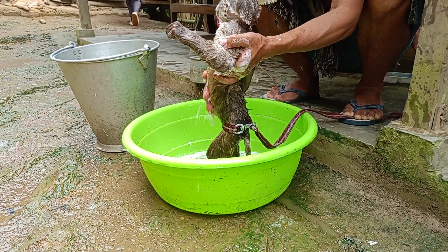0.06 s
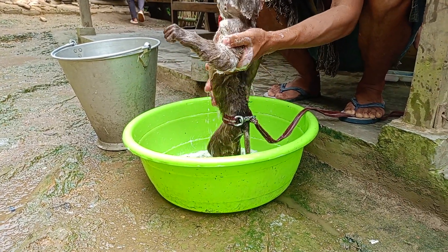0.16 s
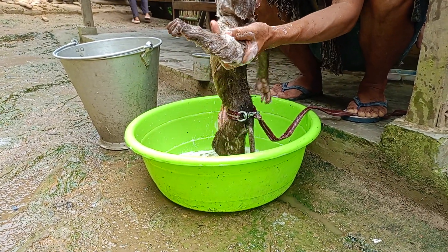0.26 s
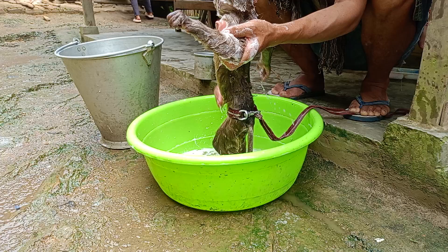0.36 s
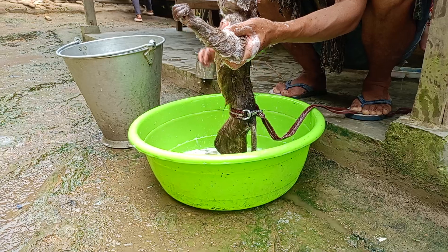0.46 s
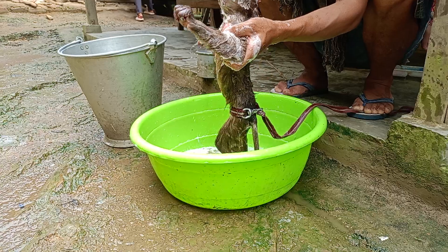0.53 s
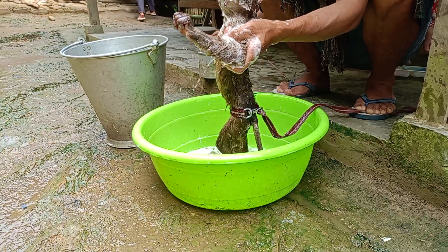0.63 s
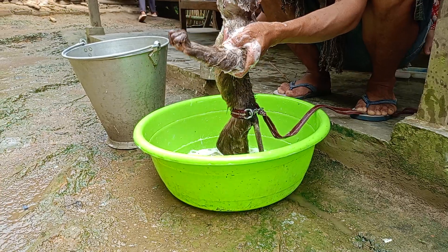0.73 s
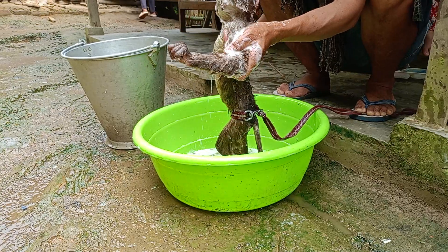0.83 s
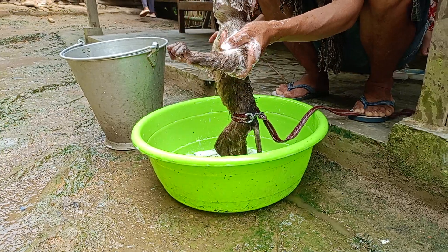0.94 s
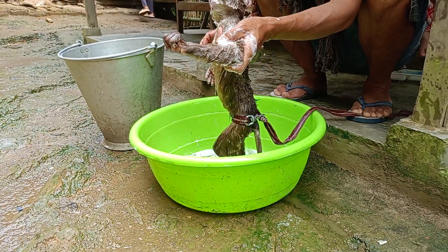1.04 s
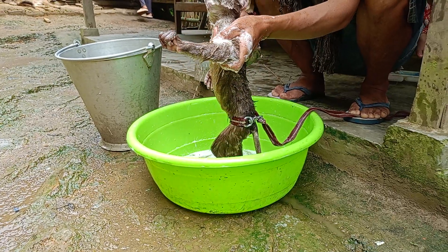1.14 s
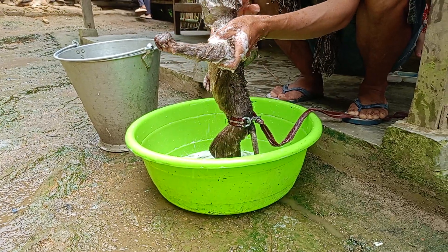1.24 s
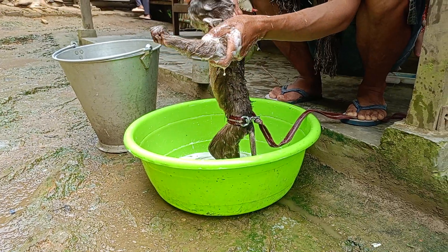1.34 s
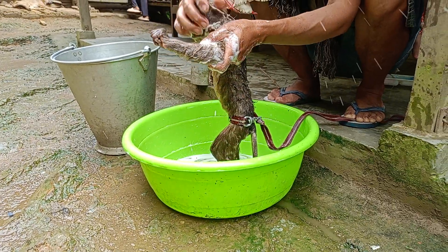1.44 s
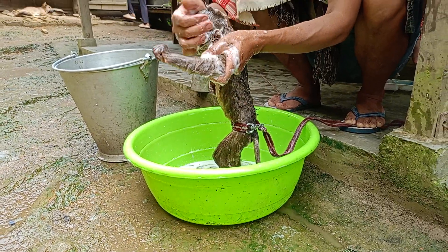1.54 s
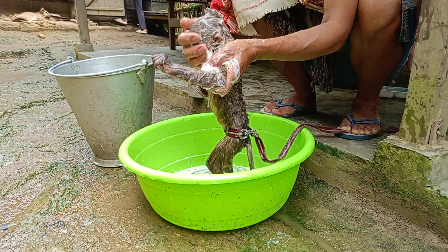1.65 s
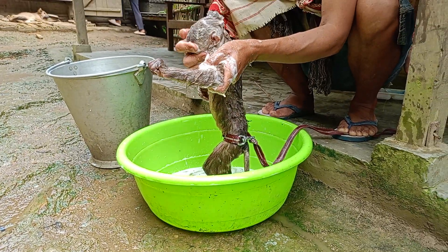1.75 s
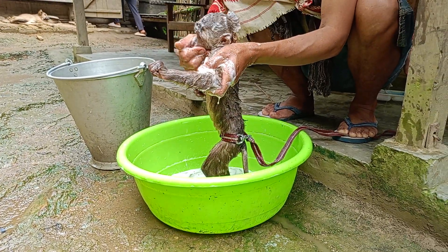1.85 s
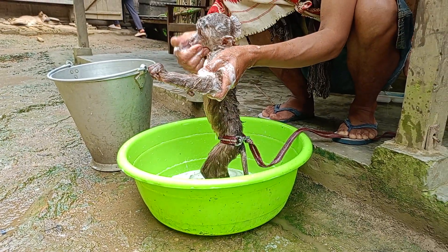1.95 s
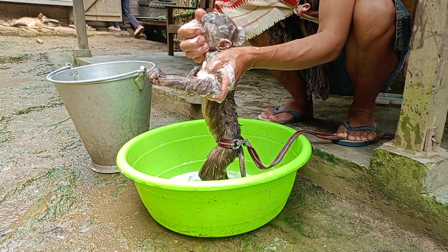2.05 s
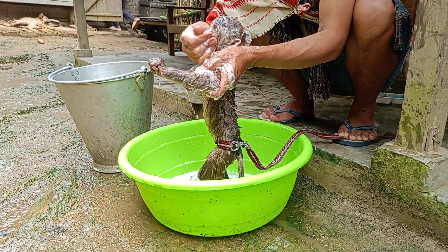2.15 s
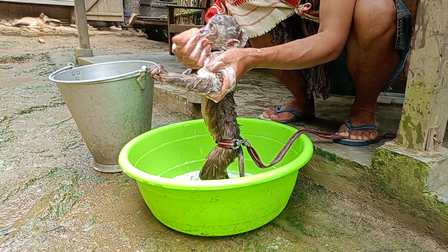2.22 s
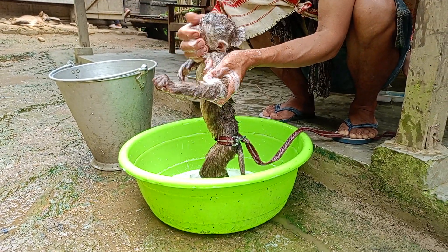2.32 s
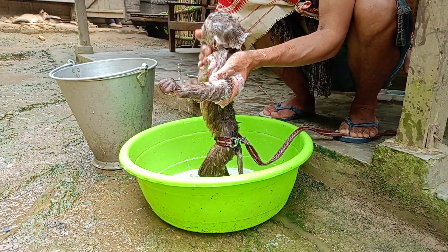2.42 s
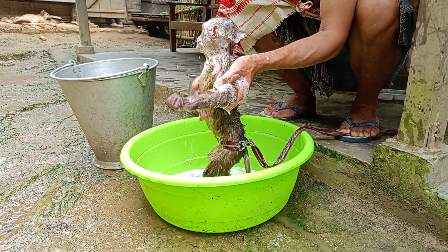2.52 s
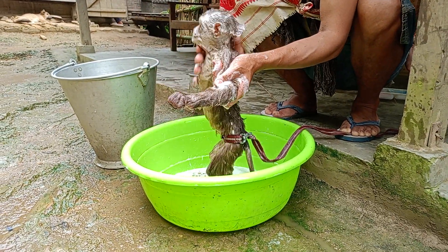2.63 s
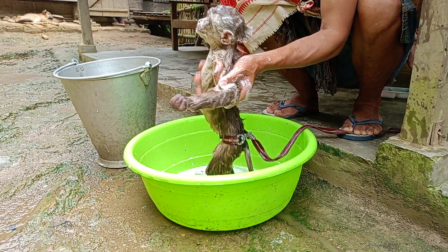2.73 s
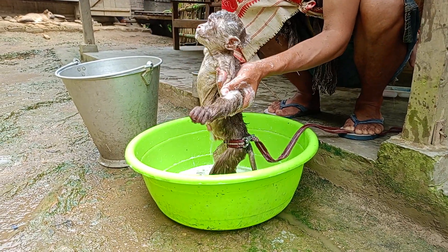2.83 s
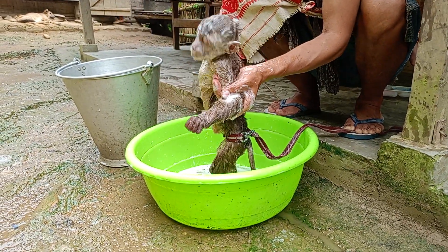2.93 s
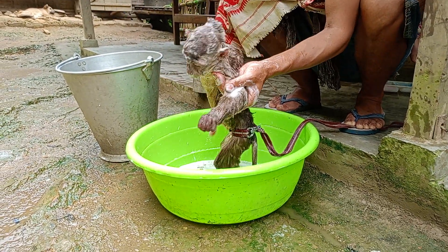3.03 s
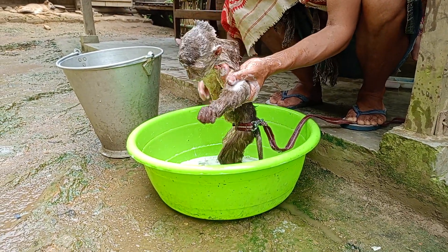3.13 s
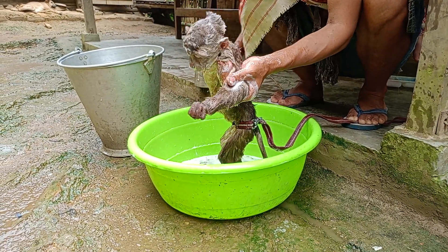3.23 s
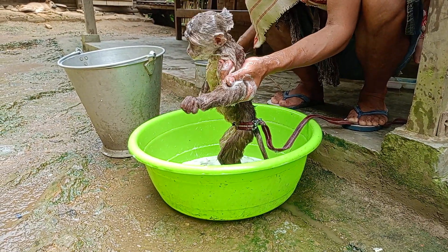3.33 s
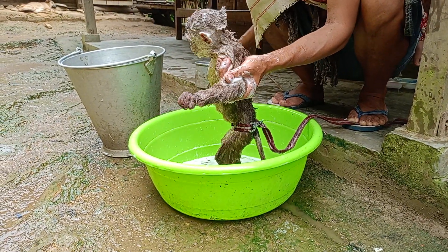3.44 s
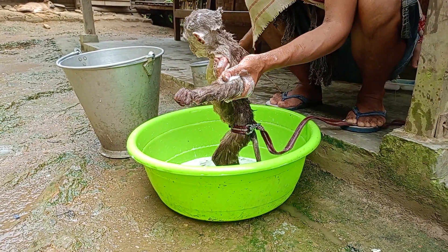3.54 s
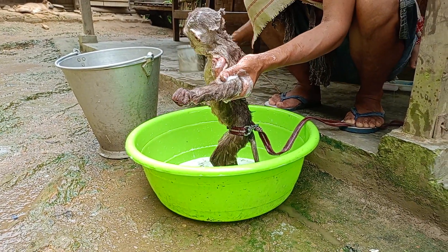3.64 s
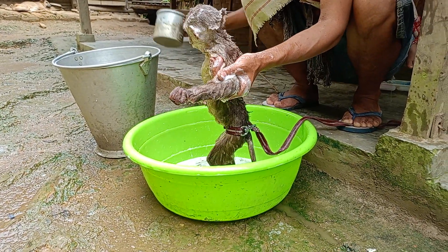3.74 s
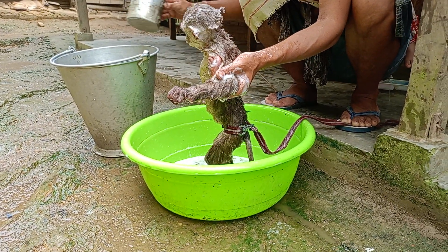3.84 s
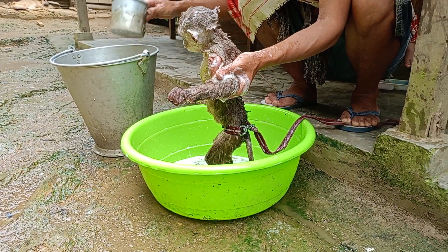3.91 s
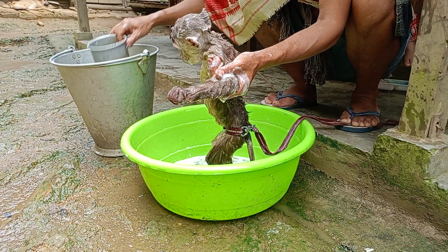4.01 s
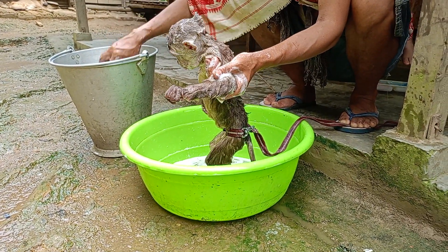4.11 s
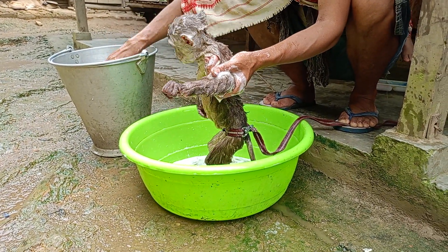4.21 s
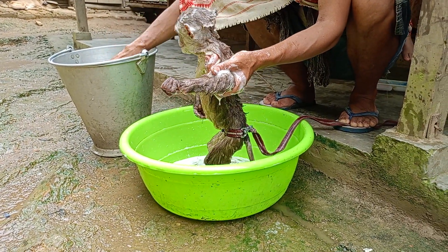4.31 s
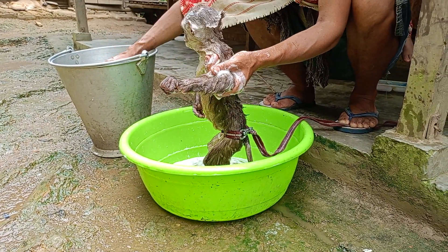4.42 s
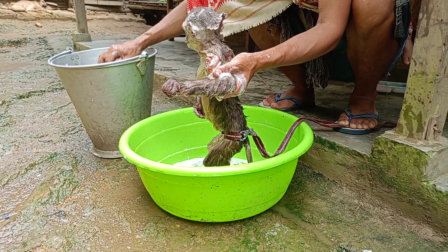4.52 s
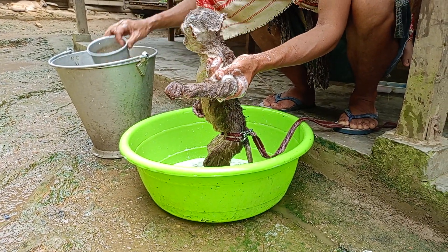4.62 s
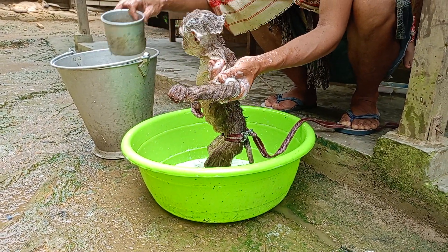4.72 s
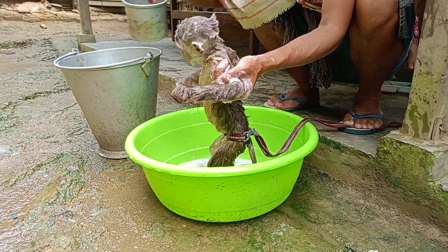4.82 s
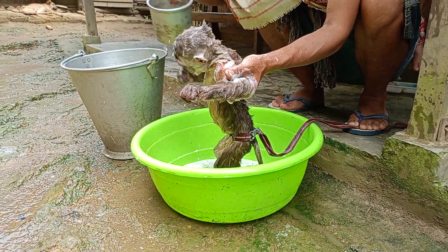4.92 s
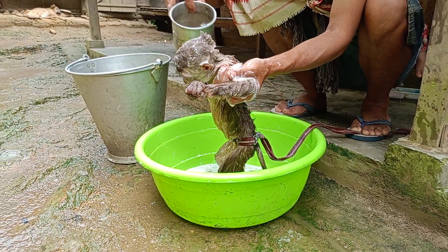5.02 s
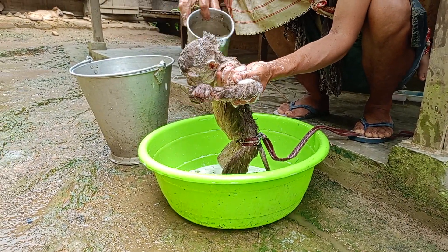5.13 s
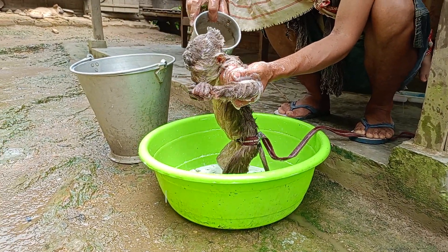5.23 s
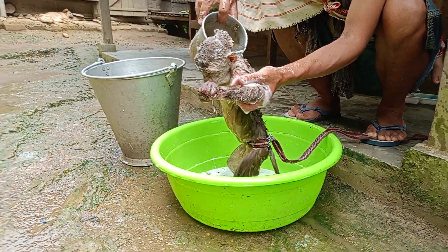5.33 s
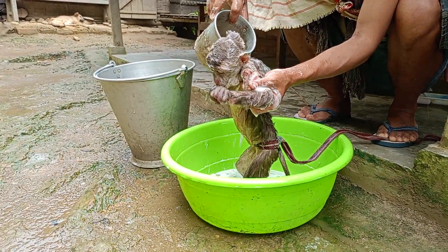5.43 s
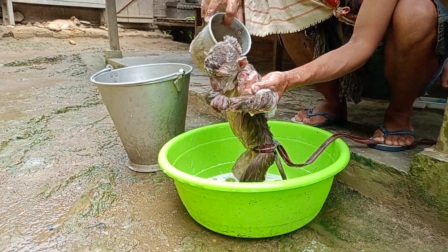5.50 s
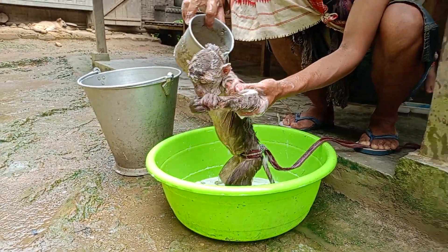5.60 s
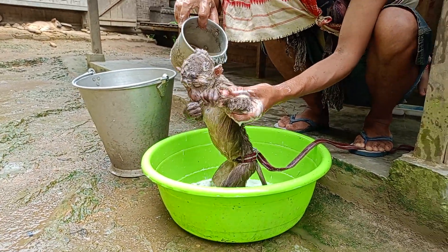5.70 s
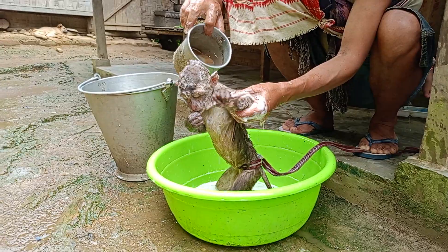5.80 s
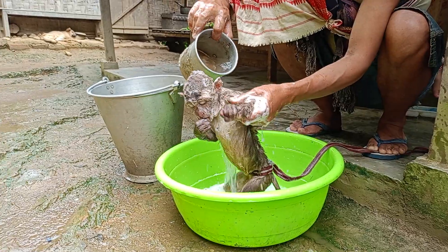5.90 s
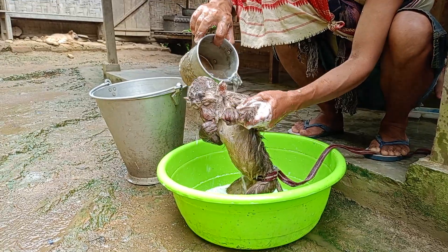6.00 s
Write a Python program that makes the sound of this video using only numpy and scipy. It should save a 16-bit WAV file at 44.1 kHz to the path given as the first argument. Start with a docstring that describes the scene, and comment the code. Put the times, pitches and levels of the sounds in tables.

```python
"""A steady yard hiss with far insects and soft wet rubbing come first: an animal is soaped in a plastic basin.
Noise shaped by spectra makes the yard and spray; crowds of tiny bubbles make the wet crackle of foam and
running water. Drips and larger bubbles are dying sines, and thuds are low tones with rumble. A metal cup is
picked up, plunged into a bucket, filled with a gulp and lifted out streaming: struck modes ring, bubble clouds
splash and one tone sings. The porch echoes bubbles, splashes, thuds and metal."""
import sys
import numpy as np
from scipy import signal
from scipy.fft import rfft, irfft
from scipy.io import wavfile
from scipy.ndimage import uniform_filter1d

SR = 44100
rng = np.random.default_rng(int(sys.argv[2]) if len(sys.argv) > 2 else 0)


def log_audio(samples):
    """Write samples as a 16-bit WAV file to the path given in sys.argv[1]."""
    # one column per channel
    frames = np.atleast_2d(samples).T
    # limit to full scale, then quantise
    limited = np.clip(frames, -1, 1)
    pcm = np.round(limited * 32767).astype(np.int16)
    wavfile.write(sys.argv[1], SR, pcm)


def convert_level_to_amplitude(level_db):
    """Map a level in decibels to its linear amplitude factor."""
    exponent = np.asarray(level_db, float) / 20
    return 10 ** exponent


N = 267246  # length in samples

# Spectrum of the yard's murmur, relative: pitch_hz, level_db (per Hz)
YARD_SPECTRUM = [(18, -62), (30, -41), (43, -25.5), (113, -17), (375, -18.5), (455, -11.5), (528, -13.5),
                 (1750, -15), (1950, -5.5), (2870, -1), (3190, -7.5), (4120, -4.5), (5000, -27.5),
                 (6500, -65), (11000, -120)]
# Spectrum of the far insects up to about 11 kHz, plus a faint separate hump near 15 kHz, relative: pitch_hz, #
# level_db (per Hz)
INSECT_SPECTRUM = [(4200, -73), (4600, -12.5), (6500, -12), (7500, -4.5), (7900, -0.5), (8800, 1),
                   (9250, -8), (9500, -12.5), (10600, -20), (11000, -31), (13500, -38), (14500, -33),
                   (15600, -30), (16200, -45)]
# Steady level of the wet crackle, joined by straight lines, with a swell near 5 s as water streams from the
# cup: time_s, level_db
CRACKLE_LEVELS = [(0, -55.5), (.9, -57), (1.0, -65), (1.28, -90), (1.33, -57), (3.2, -61.5), (4.95, -56.5),
                  (5, -53.5), (5.2, -58.5), (6.06, -56)]
# Squelches of squeezed foam and slaps of water: start_s, level_db
SQUELCHES = [(.347, -70), (0.84, -55), (1.31, -54), (1.547, -60), (1.726, -51.5), (2.24, -68), (4.145, -55),
             (4.421, -61), (5.382, -61), (5.503, -56), (5.783, -57)]
# Spectrum that colours the wet crackle: pitch_hz, level_db (per Hz)
FOAM_SPECTRUM = [(530, -42), (900, -19.5), (953, -18.5), (1810, -6), (2570, 2.5), (4180, -0.5), (5000, -25),
                 (6500, -13), (11000, -120)]
# Loudest single bubbles and drips: start_s, level_db (before shaking), pitch_hz (at the start), t60_s
BUBBLES = [(.323, -52, 1070, 0.12), (.33, -52, 1514, 0.22), (.366, -47, 2930, 0.027),
           (.841, -42, 2800, 0.043), (1.548, -42, 2680, 0.013), (1.737, -50, 1940, .034),
           (3.2405, -31.5, 2470, 0.02), (3.242, -48.5, 1620, 0.12), (3.2468, -37, 2160, 0.0082),
           (4.16, -39, 336.4, 0.12), (4.451, -38, 1270, 0.079), (4.462, -32, 291, 0.023),
           (4.462, -29, 873, 0.018), (4.473, -29, 606, 0.078), (4.631, -50.5, 1270, 0.15),
           (4.647, -52.5, 682, 0.29), (4.698, -29, 1276, 0.038), (4.709, -26, 769, 0.047),
           (4.709, -23, 980, 0.019), (4.735, -37, 901, 0.19), (4.802, -29.5, 1015, 0.014),
           (4.807, -28.5, 1190, 0.035), (5.642, -54, 823, 0.034), (5.66, -57, 860, 0.026),
           (5.79, -52.5, 1043, 0.023), (5.976, -44, 3010, .025), (6.032, -41.5, 1890, 0.014),
           (6.034, -53.5, 455, 0.11), (6.043, -52, 796, .1)]
# Bursts of fine spray: start_s, level_db (played at half this amplitude), tilt_db (per octave)
SPRAY_BURSTS = [(.3326, -66, -4), (.3641, -63, -1), (2.59, -66, -4), (2.7866, -63, -6), (3.1083, -63, 22),
                (3.1294, -65, 14), (3.2399, -71, 3), (4.166, -61, -6), (4.2527, -48, 6), (4.4544, -57, -3),
                (4.466, -47, -9), (4.6448, -65, 10), (4.7027, -58, 10), (4.8074, -55.5, 30),
                (5.654, -56, -15), (5.9858, -65, 5.5), (6.0342, -60, 7)]
# Spectrum of the spray, relative: pitch_hz, level_db (per Hz)
SPRAY_SPECTRUM = [(3500, -46), (5200, 0), (9300, -6), (10600, 1.5), (12200, -10), (15100, -2), (15700, 4),
                  (15900, -40)]
# Low thuds through bucket and ground: start_s, level_db (of the tone), pitch_hz, t60_s
THUDS = [(.63, -58, 140, 0.21), (.799, -74, 180.4, 0.66), (1.63, -67, 101, 0.12), (4.15, -46.5, 198, 0.088),
         (4.157, -46, 104, 0.11), (4.199, -46, 135.3, 0.47), (4.548, -74, 94.5, .5), (5.97, -71, 90, 0.17)]
# Ways the empty cup rings: pitch_hz, level_db (relative), t60_s
CUP_MODES = [(584.8, -1.5, 0.32), (640, 1.5, 0.11), (977, -11, 0.087), (1023, -7, 0.26), (1270, -35, 0.44),
             (1860, -38, 0.046)]
# Soft knocks on the empty cup: start_s, level_db, hardness_db (per octave)
KNOCKS = [(.963, -55, -20), (1.046, -54.5, -6), (1.19, -64.5, -5), (3.576, -47.5, -16), (3.586, -38, -11),
          (3.635, -46.5, 18)]
# Cup in the bucket: start_s, level_db, rise_s, pitch_hz (largest bubbles), tilt_db (per octave)
SPLASHES = [(4.146, -33, 0.054, 785, 5), (4.46, -32.5, 0.013, 287, 0), (4.661, -47, .021, 700, 7),
            (4.707, -37, 0.0012, 700, 0), (4.8, -36.5, 0.0017, 807, -6.5), (6.032, -46.5, 0.012, 300, 3.5)]
# Fall of a splash above its smallest bubbles, relative: pitch_hz, level_db (per Hz)
SPLASH_TOP = [(4300, -13), (4800, -25), (6500, -34.5), (9100, -45), (15400, -110)]
# Ways the filled bucket rings: pitch_hz, level_db (relative), t60_s
BUCKET_MODES = [(1190, -14, 0.11), (1562, -13.5, 0.2), (1662, -10.5, 0.14), (1984, -0.5, 0.045),
                (2190, -7.5, 0.11), (2848, 0, 0.06), (3510, -8, .13), (4440, -24, 0.59), (5520, -25, 0.32),
                (5760, -25.5, 0.29), (5980, -27, 0.097)]
# Cup against the bucket wall: start_s, level_db, hardness_db (per octave)
CLINKS = [(4.167, -34.5, -12), (4.19, -32.5, -8.5), (4.462, -34.5, 0), (4.673, -44.5, 4.5),
          (4.712, -35.5, -4.5), (4.81, -51, 10), (6.045, -41.5, 1)]
# The wet cup sings as it is carried, joined by straight lines: time_s, level_db
SING_LEVELS = [(4.82, -53), (4.87, -57), (4.96, -60), (5.01, -50), (5.08, -59), (5.3, -65)]


def evened(x):
    """Scales a sound to an rms (average strength) of 1."""
    return x / np.sqrt(np.mean(x ** 2) + 1e-20)


def read(points, hz):
    """Reads a spectrum between its points, on a log-frequency axis."""
    point_hz, value = np.transpose(points)
    return np.interp(np.log(hz + 1), np.log(point_hz + 1), value)


def add(mix, start_s, sound):
    """Mixes a sound in at its start time, cut off at the end of the mix."""
    part = mix[round(start_s * SR):][:len(sound)]
    part += sound[:len(part)]


def colour(x, points, tilt_db=0):
    """Filters by a spectrum; the tilt turns about 13 kHz and stays constant below SR / 5."""
    hz = np.fft.rfftfreq(len(x), 1 / SR)
    octaves = np.log2(np.maximum(hz, SR / 5) / 13000)
    return irfft(rfft(x) * convert_level_to_amplitude(read(points, hz) + tilt_db * octaves), len(x))


def swell(rise_s, t60_s, size=SR // 2, order=2):
    """Times and an envelope of peak 1 that rises and dies; a higher order starts more softly."""
    t = np.arange(size) / SR
    rise = (1 - np.exp(-t / max(rise_s, 1e-4))) ** order
    shape = rise * convert_level_to_amplitude(-60 * t / max(t60_s, .005))
    return t, shape / shape.max()


def wobble(size, depth, smooth):
    """Slow random factor about 1; smooth is its averaging length in samples."""
    drift = uniform_filter1d(uniform_filter1d(rng.standard_normal(size), smooth), smooth)
    return 1 + depth * evened(drift)


def sine(pitch_hz):
    """A sine that follows a changing pitch by adding up its phase."""
    return np.sin(2 * np.pi * np.cumsum(pitch_hz) / SR)


def hiss(points, patchy_db):
    """Steady noise whose spectrum has faint drifting patches."""
    real, imaginary, patches = rng.standard_normal((N // 128 + 6, 257, 3)).T
    patches = evened(uniform_filter1d(uniform_filter1d(patches, 8, 0), 20, 1))
    cells = (real + 1j * imaginary) * convert_level_to_amplitude(patchy_db * patches)
    noise = signal.istft(cells, nperseg=512, noverlap=384)[1][:N]
    return evened(colour(noise, points))


def yard():
    """Two shaped noises: the broad murmur of the yard, and a high band holding a far chorus of insects up to
    about 11 kHz plus a faint separate hump near 15 kHz."""
    murmur = convert_level_to_amplitude(-55.5) * hiss(YARD_SPECTRUM, patchy_db=0.92)
    insects = convert_level_to_amplitude(-62.5) * hiss(INSECT_SPECTRUM, patchy_db=1.26)
    return murmur + insects


def fizz(density, cycles, spread_db, size):
    """Random bubbles of 40 sizes, each a short ringing that glides up; about flat per Hz."""
    out = np.zeros(size)
    for hz in np.geomspace(100, 8000, num=40):
        happens = rng.random(size) < density * hz / 75000 / SR  # small bubbles are more frequent
        strength = convert_level_to_amplitude(spread_db * np.minimum(rng.exponential(1, size), 4))
        u = np.arange(0, 5 * cycles, hz / SR)  # time counted in cycles
        ring = np.sin(2 * np.pi * (u + 0.002723 * u ** 2)) * np.exp(-u / cycles)
        ring *= rng.choice([-1, 1])
        out += signal.oaconvolve(happens * strength, ring)[:size]
    return evened(out)


def wet_crackle():
    """Foam under the hands, and water running from the cup, crackle as a dense stream of tiny bubbles, louder
    at each squeeze."""
    time_s, level_db = np.transpose(CRACKLE_LEVELS)
    pressure = convert_level_to_amplitude(np.interp(np.arange(N) / SR, time_s, level_db))
    for start_s, level_db in SQUELCHES:
        add(pressure, start_s, convert_level_to_amplitude(level_db) * swell(0.0004, t60_s=0.12)[1])
    crackle = fizz(3000, cycles=1.67, spread_db=0.36, size=N)
    return pressure * evened(colour(crackle, FOAM_SPECTRUM))


def random_drips():
    """Draws faint drips: even odds in time, in log pitch and over a 6 dB range of level."""
    per_s, faintest_db, low_hz, high_hz, t60_s = 5, -67, 600, 2200, .04
    draws = rng.random((round(per_s * N / SR), 3))
    return [(when * N / SR, faintest_db + 6 * strength, low_hz * (high_hz / low_hz) ** size, t60_s)
            for when, size, strength in draws]


def bubbles():
    """A bubble is a dying sine that climbs a little; churning water shakes its level and pitch."""
    out = np.zeros(N)
    for start_s, level_db, hz, t60_s in BUBBLES + random_drips():
        t, shape = swell(2.07 / hz, t60_s)
        pitch = hz * (1 + .25 * t) * wobble(len(t), .012, smooth=220)
        level = convert_level_to_amplitude(level_db) * wobble(len(t), .35, smooth=200)
        add(out, start_s, level * shape * sine(pitch))
    return out


def spray():
    """Bursting fine spray: short bright puffs of shaped noise."""
    out = np.zeros(N)
    size = SR // 4
    for start_s, level_db, tilt_db in SPRAY_BURSTS:
        puff = evened(colour(rng.standard_normal(size), SPRAY_SPECTRUM, tilt_db))
        shape = swell(0.0004, t60_s=0.15, size=size)[1]
        add(out, start_s, convert_level_to_amplitude(level_db) / 2 * puff * shape)
    return out


def thuds():
    """A low resonance sounds as a sine with rumbling noise around its pitch."""
    out = np.zeros(N)
    for start_s, level_db, hz, t60_s in THUDS:
        t, shape = swell(.11 * t60_s, t60_s)
        around = [(hz * 0.2, -60), (hz * 0.51, -24), (hz, 0), (hz * 2.84, -24), (hz * 5, -80)]
        rumble = evened(colour(rng.standard_normal(len(t)), around))
        rumble_share = .13 / t60_s  # a longer thud rings clearer
        add(out, start_s, convert_level_to_amplitude(level_db) * shape * (np.sin(2 * np.pi * hz * t) + rumble_share * rumble))
    return out


def strike(modes, blows, rise_s, pivot_hz, shake):
    """Neighbouring modes start in opposite sense at each blow; their level and phase are shaken."""
    out = np.zeros(N)
    for start_s, blow_db, hardness_db in blows:
        for k, (hz, mode_db, t60_s) in enumerate(modes):
            t, shape = swell(rise_s, t60_s)
            level_db = blow_db + mode_db + hardness_db * np.log2(hz / pivot_hz)  # harder = brighter
            level = convert_level_to_amplitude(level_db) * wobble(len(t), shake, smooth=400)
            phase = 2 * shake ** 2 * wobble(len(t), 2, smooth=500)  # radians
            add(out, start_s, (-1) ** k * level * shape * np.sin(2 * np.pi * hz * t + phase))
    return out


def cup_knocks():
    """Knocks set off the modes of the empty cup, which beat together; the gripping hand shakes the ring."""
    return strike(CUP_MODES, KNOCKS, rise_s=0.0047, pivot_hz=603, shake=.2)


def splashes():
    """Each splash is a cloud of bubbles over churning noise, between its largest and smallest bubbles."""
    out = np.zeros(N)
    smallest_hz, below_db = 3290, -37  # below_db: fall just under the largest bubbles' pitch
    for start_s, level_db, rise_s, low_hz, tilt_db in SPLASHES:
        low_db = tilt_db * np.log2(low_hz / smallest_hz)
        points = [(low_hz / 2, low_db + 2 * below_db), (low_hz * 0.7, low_db + below_db),
                  (low_hz, low_db), (smallest_hz, 0)]
        churn = fizz(2500, cycles=35.0, spread_db=2.5, size=SR // 2)
        churn += 0.77 * rng.standard_normal(SR // 2)
        cloud = evened(colour(churn, points + SPLASH_TOP))
        add(out, start_s, convert_level_to_amplitude(level_db) * cloud * swell(rise_s, t60_s=0.23, order=1)[1])
    return out


def bucket_clinks():
    """The cup hits the bucket wall and sets off the modes of the filled bucket, damped unevenly by water."""
    return strike(BUCKET_MODES, CLINKS, rise_s=0.0017, pivot_hz=2400, shake=0.53)


def singing_cup():
    """One high mode of the wet cup sings while it drains, with a wavering pitch and level."""
    out = np.zeros(N)
    time_s, level_db = np.transpose(SING_LEVELS)
    t = np.arange(time_s[0], time_s[-1], 1 / SR)
    pitch = 3555 * wobble(len(t), .0022, smooth=900)  # Hz
    tone = np.sqrt(2) * wobble(len(t), .4, smooth=400) * sine(pitch)
    level = convert_level_to_amplitude(np.interp(t, time_s, level_db))
    add(out, time_s[0], level * tone * signal.windows.tukey(len(t), .1))  # soft ends
    return out


def porch(x):
    """Echo as sparse taps of random sign that start after 6 ms and die by 60 dB in 0.2 s."""
    taps = np.zeros(SR // 2)
    slots = np.arange(260, len(taps) - 22, 22)  # samples; one tap falls in each slot
    taps[slots + rng.integers(0, 22, len(slots))] = rng.choice([-1., 1.], len(slots))
    taps *= convert_level_to_amplitude(-60 * np.arange(len(taps)) / SR / .2)
    return signal.fftconvolve(x, taps / np.linalg.norm(taps))[:N]


def scene():
    """Near sounds get the porch echo; hiss, wet crackle and spray are already diffuse."""
    near = splashes() + bubbles() + thuds() + cup_knocks() + bucket_clinks() + singing_cup()
    # deep bass is kept out of the near sounds
    near = signal.sosfilt(signal.butter(2, 55, "high", fs=SR, output="sos"), near)
    echo = convert_level_to_amplitude(-6.5) * porch(near)
    return (near + echo + yard() + wet_crackle() + spray())[None]


def low_pass(x):
    """Removes everything above the highest recorded frequency."""
    return signal.sosfilt(signal.butter(12, 16740, fs=SR, output="sos"), x)


def record(dry):
    """A noise suppressor takes loud sounds into its estimate and so dips each band just after them."""
    z = signal.stft(dry[0], nperseg=512, noverlap=384)[2]
    power = uniform_filter1d(uniform_filter1d(abs(z) ** 2, size=7, axis=0), size=7, axis=1) + 1e-16
    keep = np.exp(-128 / SR / 0.018)  # the estimate forgets with a time constant of 0.018 s
    estimate = signal.lfilter([1 - keep], [1, -keep], power, axis=1)
    excess_db = 10 * np.log10(estimate / power)
    dip_db = 0.9 * np.clip(excess_db - 3, 0, 14)
    dip_db[:5] = 0  # the bass passes untouched
    finished_mix = signal.istft(z / convert_level_to_amplitude(dip_db), nperseg=512, noverlap=384)[1][None, :N]
    return low_pass(finished_mix)


dry = scene()
out = record(dry)
log_audio(out)
```